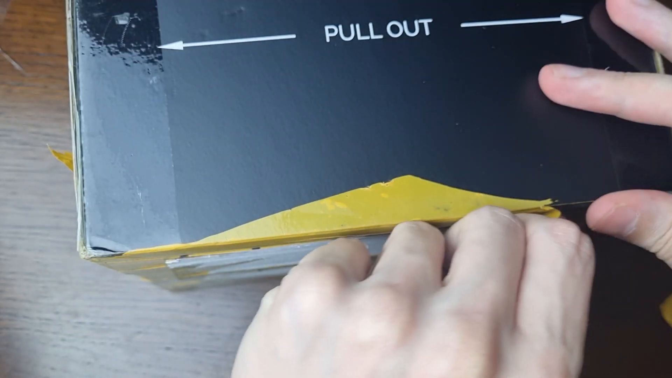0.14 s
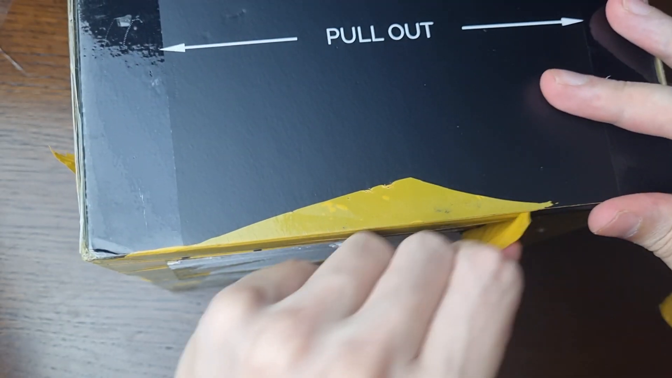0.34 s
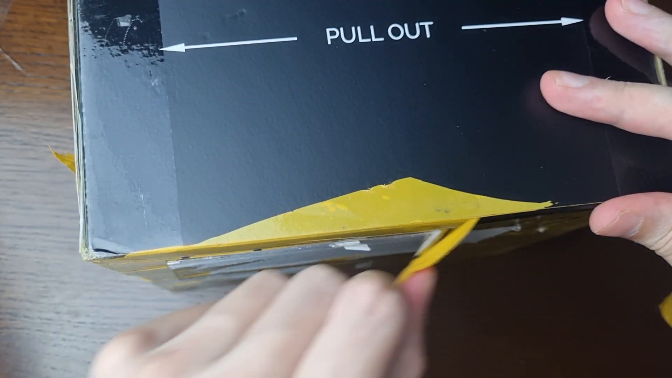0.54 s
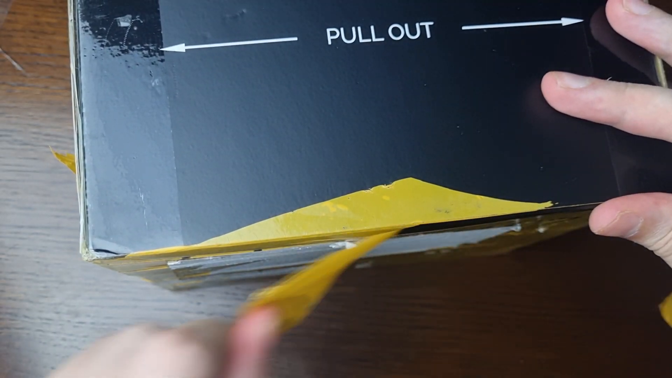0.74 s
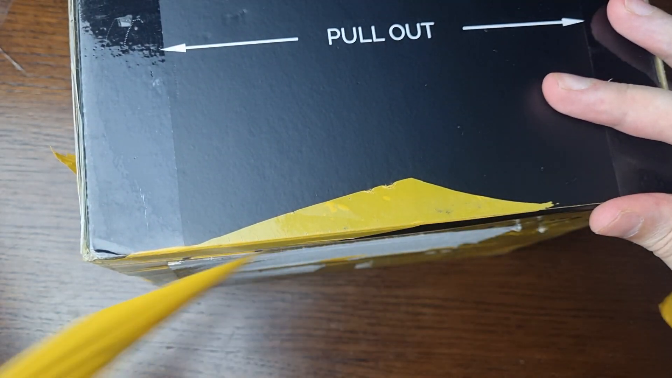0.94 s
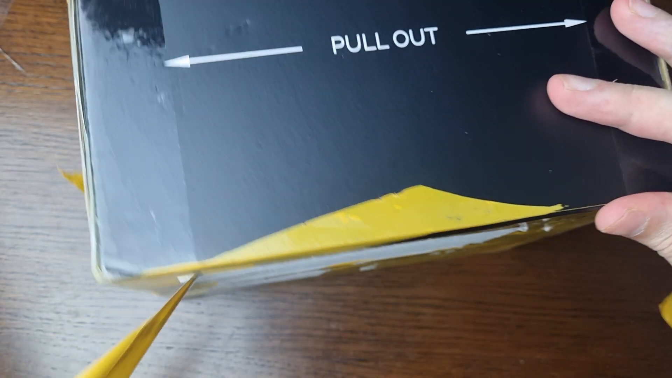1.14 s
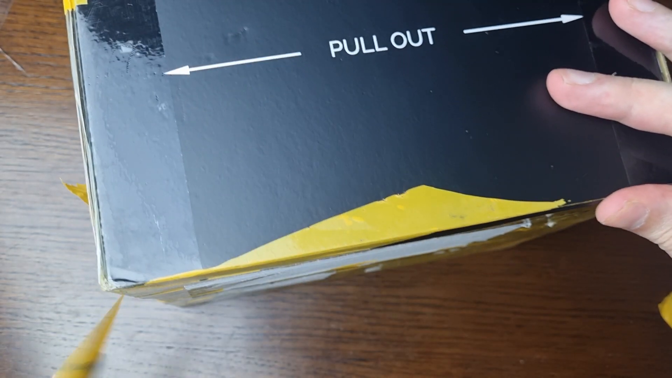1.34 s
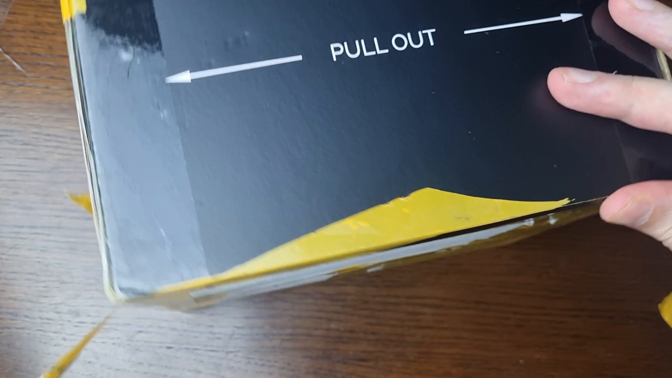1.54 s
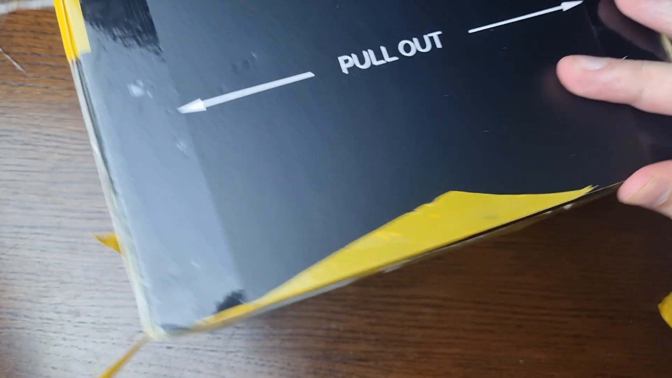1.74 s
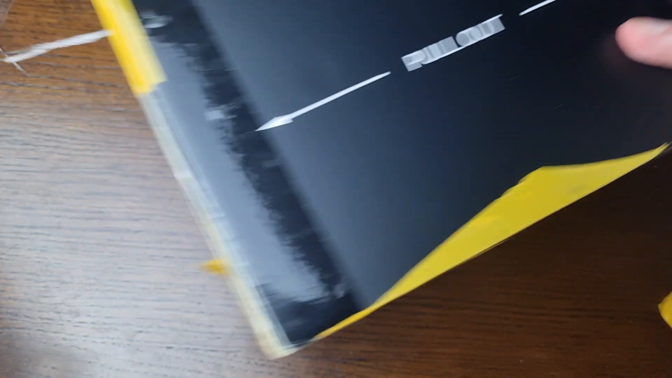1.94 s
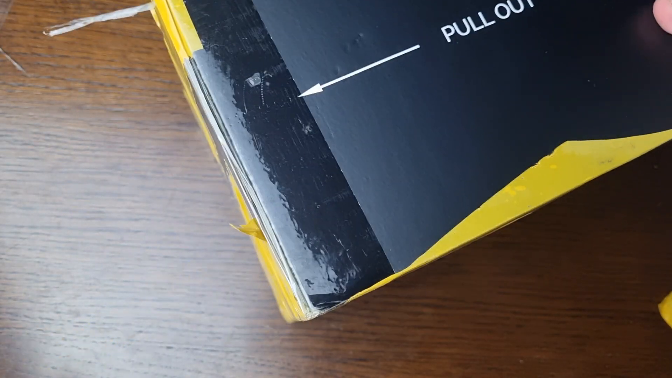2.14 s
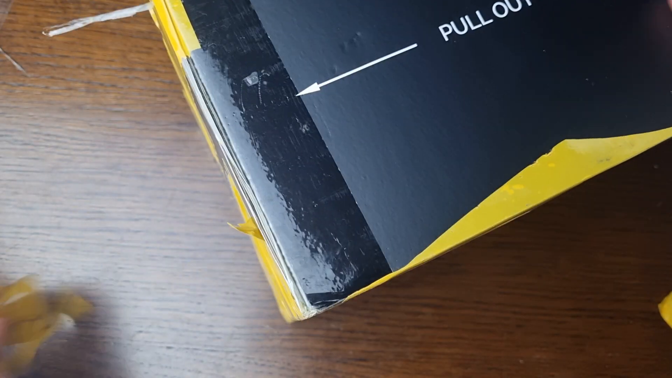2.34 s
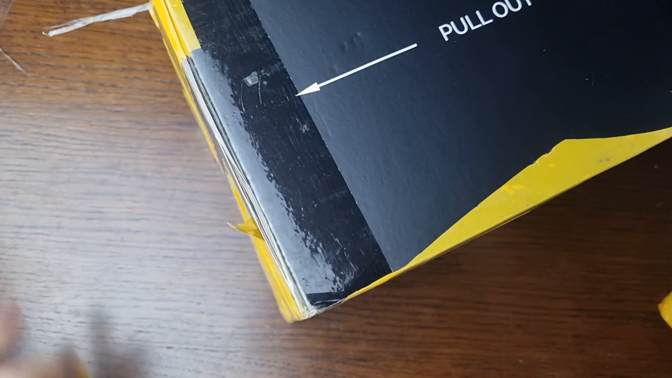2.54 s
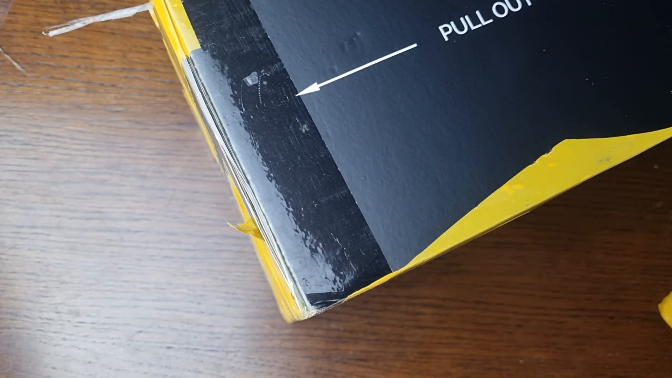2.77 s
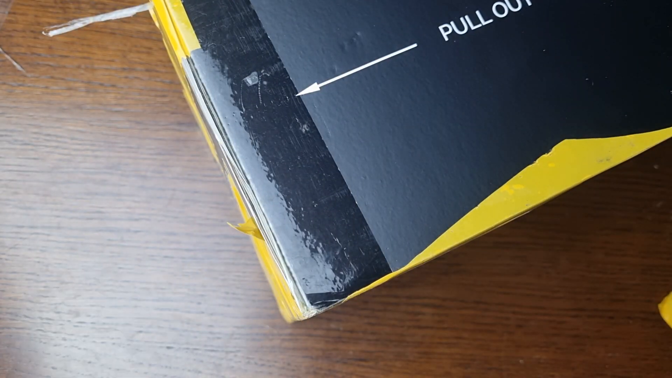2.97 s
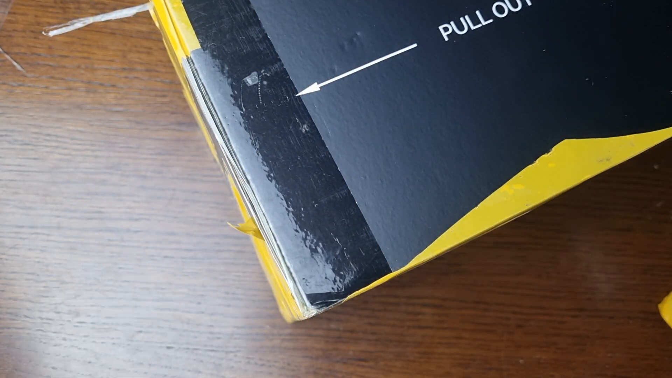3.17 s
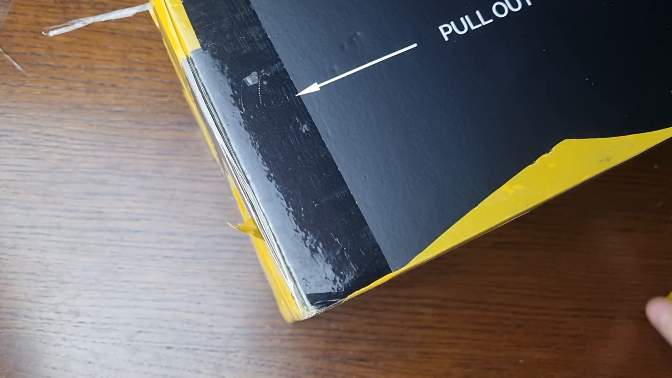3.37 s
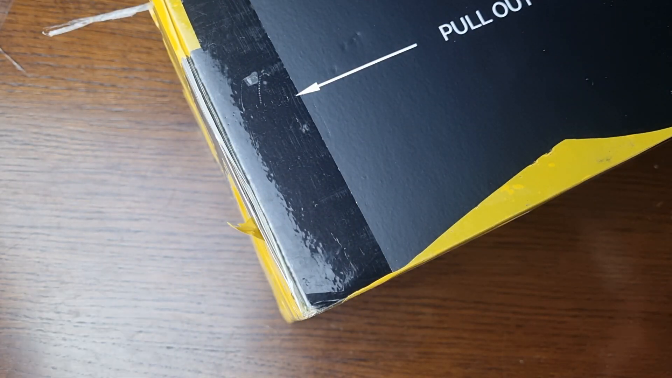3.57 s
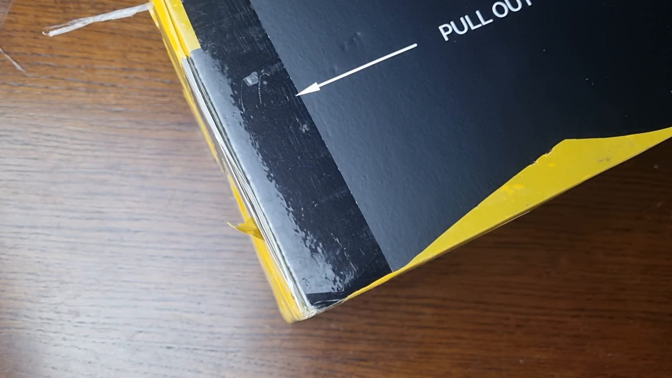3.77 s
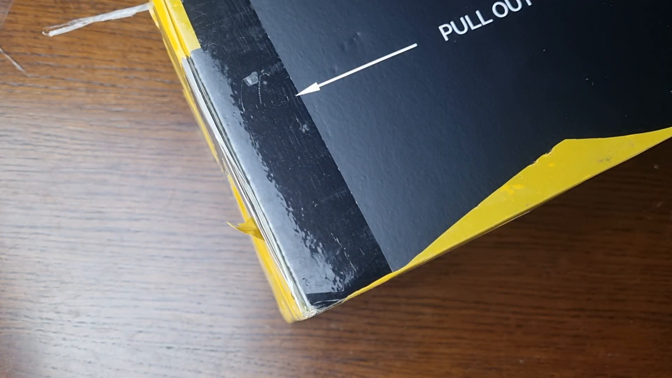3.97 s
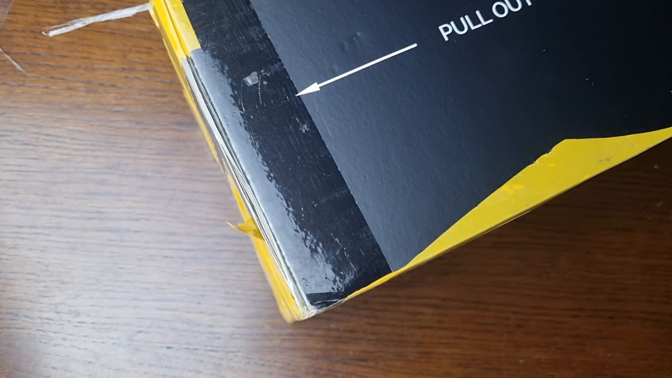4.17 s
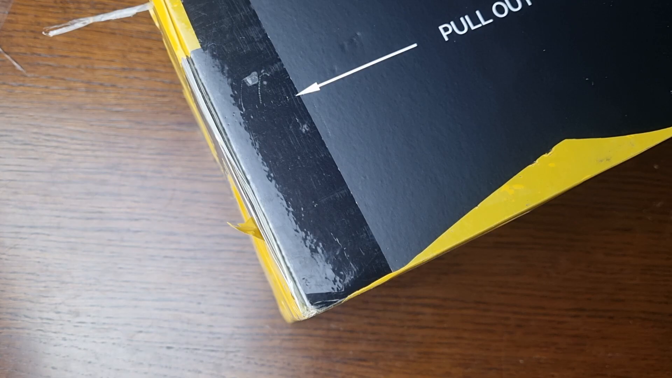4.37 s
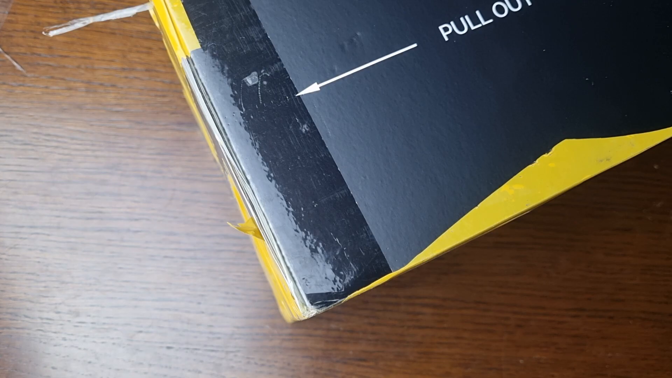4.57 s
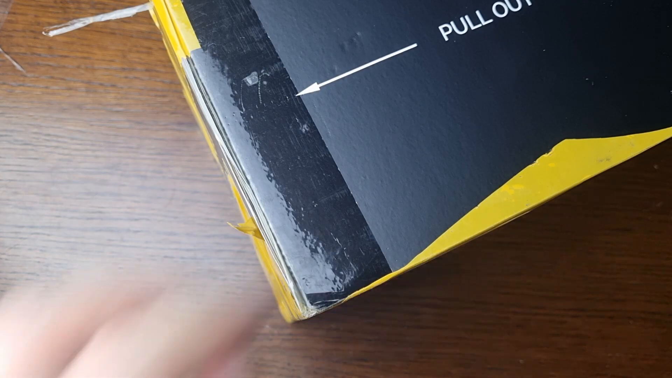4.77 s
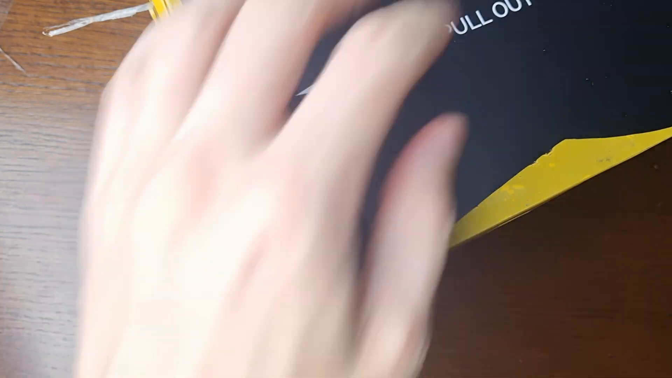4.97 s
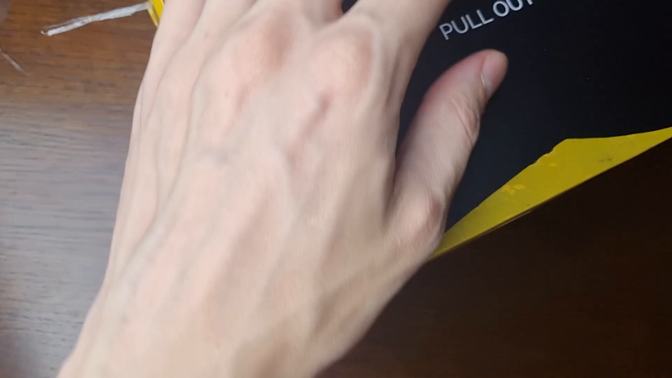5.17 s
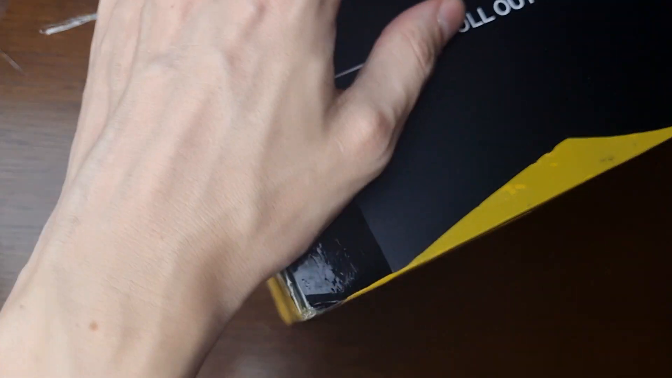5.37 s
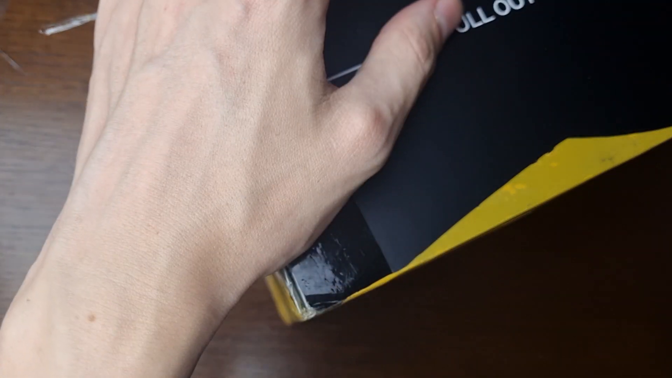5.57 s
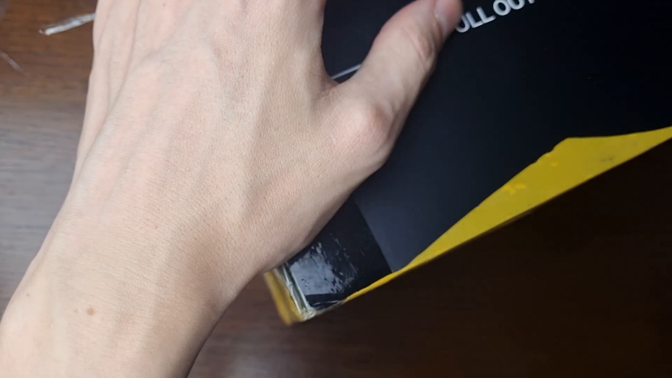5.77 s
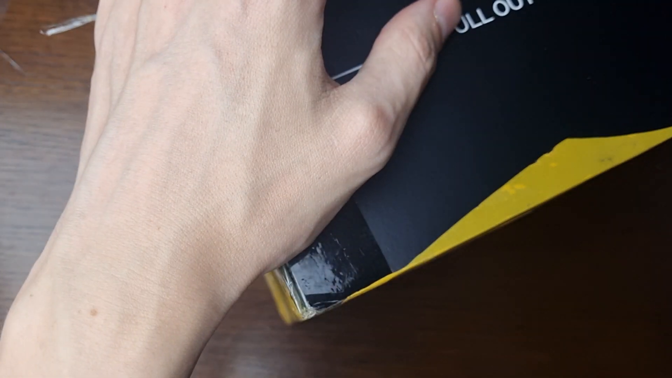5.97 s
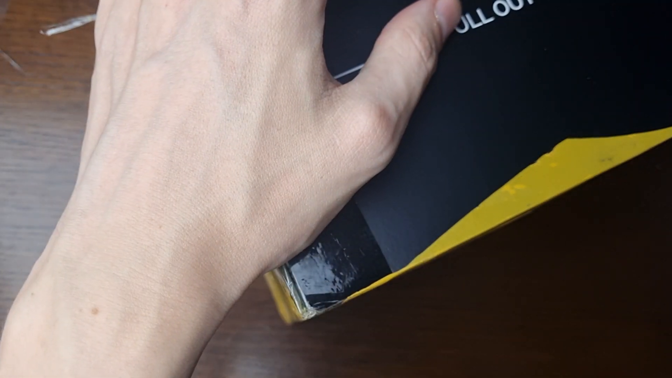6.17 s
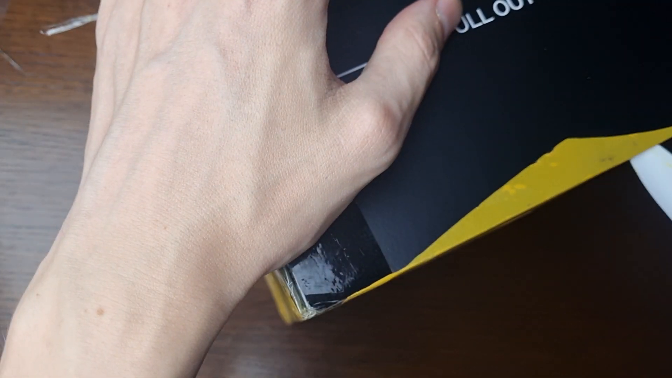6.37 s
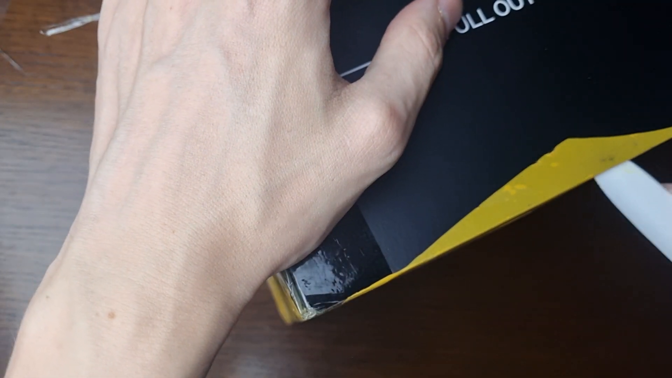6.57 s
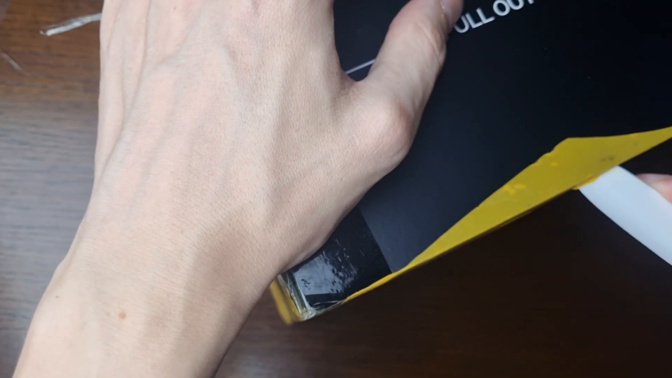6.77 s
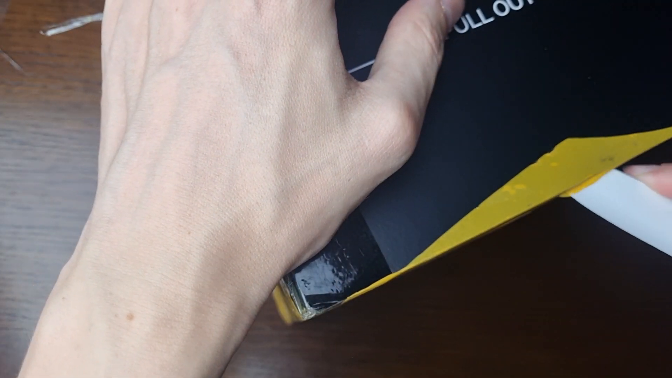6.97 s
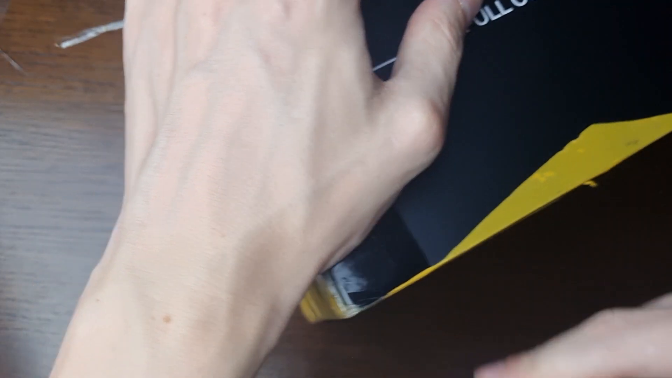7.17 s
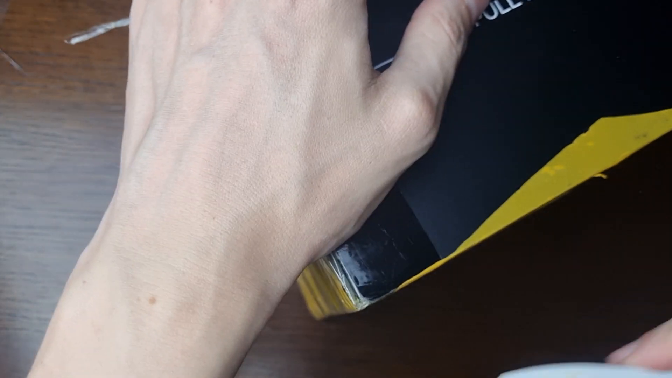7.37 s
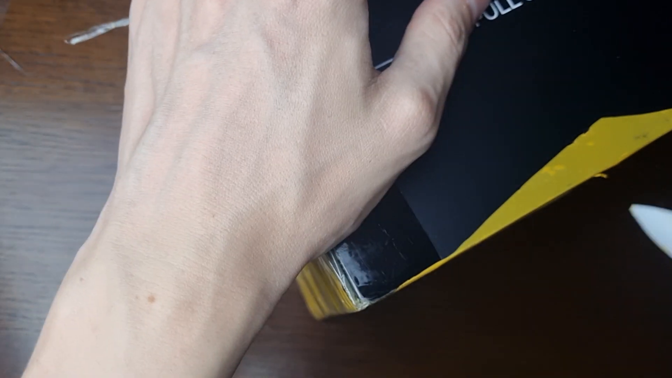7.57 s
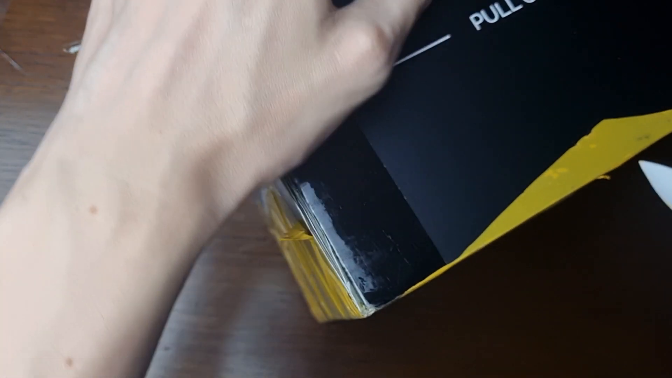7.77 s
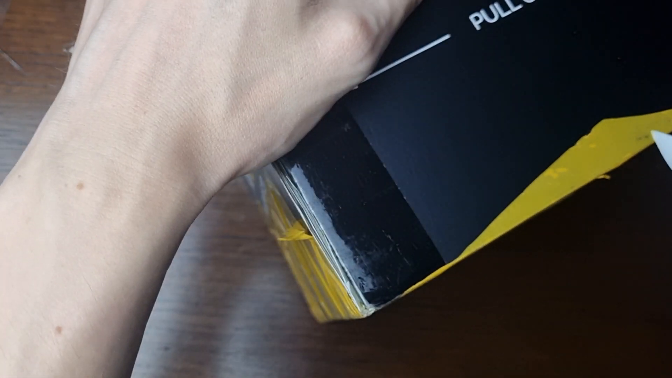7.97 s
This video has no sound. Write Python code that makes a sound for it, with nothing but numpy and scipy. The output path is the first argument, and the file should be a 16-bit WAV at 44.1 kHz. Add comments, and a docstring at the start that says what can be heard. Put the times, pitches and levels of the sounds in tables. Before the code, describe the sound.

Very close stereo in a small quiet room: tape is pulled off a hollow cardboard box with snaps, a quick stutter and a dense crackly rip, then a louder volley of pops. Small crinkles follow as the tape is crumpled, then near silence with a faint thin squeak. Finally a knife rubs and taps the box, and slits tape with one sharp crack.

```python
"""Packing tape is peeled off a cardboard box in a stereo close-up, then crumpled; a thin squeak follows, and at last
a knife slits more tape. The glue lets go in snaps and a dense crackle: noise bursts that also excite the decaying
modes of the hollow box. Hands, knife and table push on the box, brushes are swelling noise, the squeak is a sine.
A small room answers with scattered echoes, over a wavering low hum of narrow noise bands and a faint hiss."""
import sys
import numpy as np
from scipy import signal
from scipy.fft import rfft, irfft
from scipy.io import wavfile
from scipy.ndimage import uniform_filter1d

SR = 44100
rng = np.random.default_rng(int(sys.argv[2]) if len(sys.argv) > 2 else 0)


def gain_from_db(level_db):
    """Turn a decibel level (scalar or array-like) into a linear amplitude factor."""
    decades = np.asarray(level_db, float) / 20
    return 10 ** decades


def to_wav(s):
    """Save 16-bit WAV."""
    ch = np.atleast_2d(s).T  # columns
    pcm = np.round(np.clip(ch, -1, 1) * 32767)  # PCM
    wavfile.write(sys.argv[1], SR, pcm.astype(np.int16))


N = 353241  # samples

# spectrum radiated by tape: (frequency [Hz], relative density [dB per Hz])
TAPE_SPECTRUM = [(880, -17), (1500, -10), (3030, -6), (3280, -8), (4300, -6), (6690, -7.5), (7620, -8.5),
                 (11300, -11.5), (14500, -11), (16000, -16.5), (16500, -35)]
# modes of the hollow box: (frequency [Hz], width before the damping factor [Hz], envelope peak [dB])
BOX_MODES = [(97, 44, -14), (159.3, 42, -13.5), (200, 44, -17), (314.4, 110, 1), (400, 77, -11),
             (503.2, 67, -6.5), (579, 93, -5.5), (731, 77, -10.5), (905.5, 150, -2.5), (1060, 52, -14),
             (1188.6, 95, -13), (1340, 250, 2.5), (1750, 180, -4), (2100, 88, -15)]
# where the hands work: (time [s], delay of the left behind the right in the treble [samples],
# level difference left-right [dB])
HANDS = [(0, 7.5, -1), (.4, -9.5, 0), (1.3, -11, 4), (1.8, -13.5, 4.5), (2.9, -9, 3), (3.3, 7.5, 0),
         (4.2, 11, -17), (5.4, 11, -8.5), (5.8, 5.5, -9.5), (6.5, 6.5, -2.5), (7.1, -4.5, -3), (8, 7, -5.5)]


def evened(x):
    """Normalises mean power: scales to rms 1."""
    return x / np.sqrt(np.mean(x ** 2) + 1e-20)


def read(points, hz):
    """Interpolates a spectrum on a logarithmic frequency axis."""
    f, value = np.transpose(points)
    return np.interp(np.log(hz + 1), np.log(f + 1), value)


def add(mix, s, sound):
    """Superposition: adds a sound to the mix from time s."""
    part = mix[..., round(s * SR):][..., :sound.shape[-1]]
    part += sound[..., :part.shape[-1]]


def sides(db):
    """Interaural level difference: gains of left and right, split evenly."""
    return gain_from_db(np.array([db / 2, -db / 2]))


def hands_db(s):
    """Level difference left-right [dB] that follows the hands."""
    times, _, difference_db = np.transpose(HANDS)
    return np.interp(s, times, difference_db)


def colour(x, points):
    """Linear-phase filtering by a short impulse response with the given spectrum."""
    hz = np.linspace(0, SR / 2, 257)
    gain = gain_from_db(read(points, hz)) * (hz < SR / 2)
    return signal.oaconvolve(x, signal.firwin2(255, hz, gain, fs=SR)[None], "same", axes=1)


def resonate(x, hz, width):
    """A single-pole complex resonator, of gain 1 at its centre."""
    r = np.exp(-np.pi * width / SR)
    return 2 * signal.lfilter([1 - r], [1, -r * np.exp(2j * np.pi * hz / SR)], x).real


def background(apart=0.31, steady=0.14, waver_db=3):
    """Partial coherence: two narrow low bands nearly alike on both sides, and a hiss independent on each."""
    # swells of the hum: (middle [s], full width at 1/e [s], lower band level [dB], upper band level [dB])
    swells = [(0.078, .15, -59, -73.5), (.3, 0.23, -56, -71), (1.6, 0.19, -60, -81.5),
              (2.017, 0.35, -70, -73), (2.36, 0.17, -74, -66), (2.545, 0.18, -67, -82.5),
              (3.104, 0.3, -65.5, -81.5), (3.885, 0.26, -67, -85), (4.318, 0.13, -63.5, -76.5),
              (4.769, 0.28, -59.5, -75), (5.17, 0.26, -62, -73), (5.602, 0.13, -63.5, -73),
              (6.056, 0.22, -65, -67.5), (6.5, 0.33, -76, -69), (6.875, 0.37, -67.5, -75),
              (7.26, 0.12, -64.5, -70), (7.694, 0.11, -61, -66.5), (7.836, 0.12, -56.5, -70)]
    # hum bands: (frequency [Hz], width of each of three resonators in series [Hz])
    hum_bands = [(67, 36), (182, 66)]
    # hum between swells: (lower band level [dB], upper band level [dB])
    rest_levels = (-76.5, -79.5)
    # hiss, kept above 250 Hz only: (frequency [Hz], relative density [dB per Hz])
    hiss_spectrum = [(12, -41), (20, -11), (32, -11), (65, 3), (94, -17), (184, -17), (297, -37),
                     (939, -50), (1470, -46), (1650, -51), (10000, -60.5), (13000, -56.5), (16500, -59)]
    hiss_db = -83

    middle, length, *levels = np.transpose(swells)
    t = np.arange(0, N / SR + .02, .01)[:, None]
    swell = np.exp(-(2 * (t - middle) / length) ** 2)
    noise, hum = rng.standard_normal((5, N)), 0
    for db, rest_db, (hz, width) in zip(levels, rest_levels, hum_bands):
        band = noise[0] + apart * noise[1:3]
        for _ in range(3):
            band = resonate(band, hz, width)
        # partly flattens the fluctuation natural to narrow noise
        power = uniform_filter1d((band ** 2).mean(0), 3000)
        band = band / (power + 1e-12) ** (steady / 2)
        waver = gain_from_db(waver_db * evened(uniform_filter1d(rng.standard_normal(len(t)), size=8)))
        envelope = gain_from_db(rest_db) * waver + swell @ gain_from_db(db)
        hum = hum + np.interp(np.arange(N) / SR, t[:, 0], envelope) * evened(band)
    hz = np.fft.rfftfreq(N, 1 / SR)
    hiss = irfft(rfft(noise[3:]) * gain_from_db(read(hiss_spectrum, hz)) * (hz > 250), N)
    return hum + gain_from_db(hiss_db) * evened(hiss)


def room(x, early_db=-9, early_ms=6.3, late_db=-15, mono_hz=800):
    """Reverberation: sparse taps of random sign, as close echoes off table and hands, then as a decaying tail."""
    # (frequency [Hz], time to decay by 60 dB [s])
    decay_times = [(250, .45), (700, 0.55), (1800, 0.49), (4600, 0.53), (12000, .36)]
    taps = np.zeros((2, SR))
    at = np.arange(40, SR - 20, 20) + rng.integers(0, 20, (2, (SR - 41) // 20))
    np.put_along_axis(taps, at, rng.choice([-1., 1.], at.shape), 1)
    early = taps * np.exp(-np.arange(SR) * 1000 / SR / early_ms)
    hz, t, z = signal.stft(taps, SR, nperseg=256)
    # long waves reach both sides nearly alike
    z = np.where(hz[:, None] < mono_hz, (z + 0.7 * z[::-1]) / np.sqrt(2), z)
    z = z * gain_from_db(-60 * t / read(decay_times, hz)[:, None])
    late = signal.istft(z, SR, nperseg=256)[1][:, :SR]
    early = gain_from_db(early_db) * early / np.linalg.norm(early[0])
    late = gain_from_db(late_db) * late / np.linalg.norm(late[0])
    return signal.fftconvolve(x.mean(0)[None], early + late, axes=1)[:, :N]


def spaced(x, broad_hz=1400, narrow_hz=2400):
    """Time difference of arrival: treble from the hands reaches one side first, the wide box both nearly together."""
    times, samples, _ = np.transpose(HANDS)
    hz, t, z = signal.stft(x, SR, nperseg=512, noverlap=384)
    share = np.interp(hz, [0, broad_hz, narrow_hz], [.4, .3, 1])[:, None]
    lag = np.interp(t, times, samples) / SR * share
    half_turns = np.array([1, -1])[:, None, None] * hz[:, None] * lag  # half the lag on each side
    return signal.istft(z * np.exp(-1j * np.pi * half_turns), SR, nperseg=512, noverlap=384)[1][:, :N]


def modes(damping=0.71):
    """Modal decay: each box mode is a damped sine with a soft start."""
    hz, width, db = np.transpose(BOX_MODES)[:, :, None]
    t = np.arange(3000) / SR
    u = np.pi * width * damping * t
    return gain_from_db(db) * u * np.exp(1 - u) * np.sin(2 * np.pi * hz * t)


def struck(force, rings, near_hz, reach_octaves=0.74, favour_db=14):
    """Modal excitation: where the box is struck decides which modes answer most; peak 1."""
    away = np.log2(np.array(BOX_MODES)[:, 0] / near_hz) / reach_octaves
    ring = signal.fftconvolve(force, gain_from_db(favour_db * np.exp(-away ** 2)) @ rings)
    return ring / abs(ring).max()


def favour(x, centre_hz, db, octaves, fall_db):
    """Radiation spectrum of tape, with one band lifted and what lies below it thinned (fall_db per octave)."""
    hz = np.fft.rfftfreq(x.shape[1], 1 / SR)
    away = np.log2((hz + 1) / centre_hz)
    lift_db = db * np.exp(-(away / octaves) ** 2)
    gain_db = read(TAPE_SPECTRUM, hz) + lift_db + fall_db * np.minimum(away, 0)
    return irfft(rfft(x) * gain_from_db(gain_db), x.shape[1])


def whistle(wobble_hz=30):
    """Frequency modulation: a thin high squeak is a sine of gliding, slightly unsteady pitch."""
    # (time [s], frequency [Hz], rms level [dB])
    glide = [(4.95, 11300, -95), (5.0, 12700, -83.5), (5.06, 12950, -79.5), (5.17, 12720, -83.5),
             (5.233, 11940, -85.5), (5.27, 13000, -84.5), (5.31, 13600, -79), (5.35, 12600, -85.5),
             (5.39, 11300, -96.5)]
    s, hz, db = np.transpose(glide)
    t, out = np.arange(s[0], s[-1], 1 / SR), np.zeros(N)
    wobble = wobble_hz * evened(uniform_filter1d(rng.standard_normal(len(t)), 200))
    phase = 2 * np.pi * np.cumsum(np.interp(t, s, hz) + wobble) / SR
    add(out, s[0], np.sqrt(2) * gain_from_db(np.interp(t, s, db)) * np.sin(phase))
    return out


def knocks(grit=0.48, damping=1.1, reach_octaves=0.4, favour_db=18):
    """Contact time: soft blows are rounded, gritty pushes; the longer the contact, the fewer high modes ring."""
    # blows of hand, knife and table: (time [s], peak level [dB], contact time [ms], box mode nearest [Hz])
    blows = [(0.237, -32.5, 1.5, 900), (0.239, -44, 4, 160), (0.383, -41, 2.8, 133),
             (0.749, -38.5, 2.7, 183), (0.963, -38, 2.3, 176), (1.151, -41.5, 2.8, 183),
             (1.231, -36, 7.7, 97), (1.533, -44.5, 4.6, 97), (1.823, -36, 5.4, 150),
             (1.899, -30.5, 3.6, 252.1), (2.212, -51.5, 0.36, 400), (2.235, -45.5, 1.2, 558),
             (2.282, -48, 0.26, 400), (2.362, -49.5, 1.3, 400), (3.373, -47, 2.7, 191),
             (3.388, -46.5, 2.1, 194), (3.421, -50, 3.1, 193), (3.399, -42, 4.16, 121.7),
             (4.931, -58, 0.11, 1295), (6.615, -39, 1.1, 384), (6.74, -38, 0.37, 330),
             (6.843, -32, 0.64, 386), (7.112, -37.5, 3.9, 129), (7.142, -39, 5.2, 97),
             (7.16, -51.5, 3, 160), (7.1445, -32, 0.18, 1600), (7.261, -47, 1.24, 280),
             (7.646, -59.5, 1.43, 465), (7.789, -51, 0.21, 1300), (7.83, -45.5, 2.56, 108.5)]
    out, rings = np.zeros(N), modes(damping)
    for (s, db, ms, box_hz), noise in zip(blows, rng.standard_normal((len(blows), 3000))):
        u = np.arange(3000) * 1000 / SR / max(ms, .05)  # time in contacts
        push = np.sin(np.pi * np.minimum(u, 1)) ** 2 + grit * noise * np.exp(-u / 2)
        add(out, s, gain_from_db(db) * struck(push, rings, box_hz, reach_octaves, favour_db))
    return out


def brushes(unlike=0.72, lumpy_db=3):
    """Friction noise: tape, skin and blade brush past as lumpy noise under a smooth swell."""
    # (middle [s], length, held to at least 300 samples [ms], rms level before the swell [dB],
    # favoured band [Hz], lift of that band [dB])
    strokes = [(0.821, 65, -36, 4400, 6), (1.037, 56, -41.5, 7400, 7), (1.192, 86, -44, 3120, -5),
               (1.255, 25, -36.5, 5230, -11.5), (2.293, 37, -65.5, 3560, 25), (2.398, 23, -37.5, 2780, 4),
               (2.593, 94, -60, 5000, 3.5), (2.867, 50, -60.5, 4150, -0.5), (3.171, 50, -47, 5400, -20.5),
               (3.559, 42, -67, 5980, 17.5), (3.69, 64, -77, 4020, -1.5), (3.885, 7.7, -73.5, 12800, 14.5),
               (3.939, 30.5, -78.5, 10000, 9.5), (4.337, 7.6, -78.5, 12700, 13.5), (5.48, 29, -84, 8020, 6),
               (6.089, 6.2, -80, 6000, 1), (3.754, 45, -69, 7730, 29), (4.025, 22, -68.5, 7990, 10),
               (4.156, 43, -68, 8980, 6.5), (4.226, 12, -70.5, 13550, 21), (4.454, 7.9, -63.5, 5500, 36),
               (4.476, 67, -80, 5440, 23), (5.3, 130, -81, 2166, 23), (4.936, 10, -72, 2453, 14.5),
               (5.064, 30, -80.5, 10000, 9), (5.169, 37, -78, 8580, -2), (5.264, 70, -69.5, 7940, 13),
               (5.399, 41, -78, 9030, 6.5), (6.241, 48, -71, 8170, 12), (6.619, 59, -51, 3490, 4.5),
               (6.743, 24, -57, 2380, 5), (6.848, 37, -55.5, 2360, 12.5), (7.8, 28, -71, 7790, 5.5),
               (7.906, 36, -69.5, 5760, 13.5)]
    out = np.zeros((2, N))
    for (s, ms, db, hz, band_db), noise in zip(strokes, rng.standard_normal((len(strokes), 4, 6000))):
        size = int(np.clip(ms * SR / 1000, 300, 6000))
        noise = noise[:, :size]
        lumps = gain_from_db(lumpy_db * evened(uniform_filter1d(noise[3], 60)))
        rub = favour(lumps * (noise[0] + unlike * noise[1:3]), hz, band_db, 1.0, 1)
        sound = evened(rub) * np.hanning(size)
        add(out, s - size / SR / 2, gain_from_db(db) * sides(hands_db(s))[:, None] * sound)
    return out


def peel(per_s=3000, spread_db=-0.5, tail_ms=0.29, bump_db=4, bump_octaves=0.076, unlike=1.0,
         reach_octaves=0.5, favour_db=11, patchy_db=2.5):
    """Shot noise: tiny random releases radiate from the free tape, which favours one band, and drive the box."""
    # peeling, ripping and rubbing, one table a stretch:
    # (time [s], crackle level [dB], favoured band [Hz], box level [dB], box mode nearest [Hz])
    stretches = [
        [(.03, -73.5, 4770, -79, 860), (.31, -46.5, 5575, -51.5, 610), (.41, -48.5, 5826, -49, 486),
         (.47, -49, 7080, -45, 600), (.53, -47.5, 7430, -48, 780), (.58, -48, 7600, -51, 600),
         (.66, -41.5, 5384, -39, 345), (.72, -40.5, 4770, -42.5, 1260), (.78, -38.5, 4565, -35, 340),
         (.86, -40.5, 4700, -40, 715), (.94, -41.5, 5520, -34.5, 633), (1.09, -47.5, 6760, -44, 436),
         (1.2, -53, 5070, -40.5, 463), (1.34, -64, 3760, -59.5, 833), (1.5, -94.5, 5994, -97, 890)],
        [(1.51, -73.5, 5390, -71, 800), (1.7, -56, 4490, -67, 1220), (1.76, -66.5, 5500, -105, 1000),
         (1.82, -54, 5550, -57, 1200)],
        [(1.82, -31.5, 7277, -42, 590), (1.855, -27, 8104, -32.5, 870), (1.868, -34.5, 7100, -29.5, 516),
         (1.912, -24, 7876, -32.5, 340)],
        [(2.18, -67.5, 4320, -64.5, 500), (2.3, -76.5, 4500, -69, 700), (2.41, -53, 3333, -62, 565),
         (2.5, -74.5, 5900, -80.5, 710), (2.7, -78.5, 6260, -86.5, 400)],
        [(2.78, -88, 4000, -87.5, 400), (2.85, -69, 4460, -85.5, 600), (2.98, -75, 4640, -86.5, 1204),
         (3.11, -44.5, 5140, -77, 498), (3.24, -52.5, 5800, -69, 1300), (3.31, -78, 6015, -92, 500),
         (3.372, -46.5, 5490, -67, 600), (3.51, -77, 5570, -83, 497), (4.4, -93.5, 6550, -97, 597)],
        [(4.9, -90, 3003, -87, 400), (5.25, -84.5, 2592, -89.5, 804), (5.55, -91.5, 2970, -87, 350)],
        [(6.2, -93.5, 7770, -104.5, 700), (6.29, -70, 7945, -91.5, 695), (6.38, -59.5, 7037, -69, 1300),
         (6.54, -67, 5277, -72, 1290), (6.63, -61.5, 4300, -62.5, 2030), (6.74, -69, 3145, -68.5, 685),
         (6.87, -77, 2730, -70.5, 1980), (7.106, -68, 5088, -68, 1100)],
        [(7.106, -46, 3823, -54, 700), (7.125, -37, 2770, -47.5, 710), (7.138, -29, 5520, -47, 655),
         (7.147, -24, 7560, -56, 647), (7.157, -46.5, 5080, -64, 300)],
        [(7.6, -84, 4930, -96, 500), (7.69, -64.5, 5318, -86, 1194), (7.8, -78, 6160, -72, 450),
         (8.0, -101, 5387, -86, 300)],
    ]
    # bands that stand out while the knife rubs the tape: (frequency [Hz], half width at 1/e in dB [Hz], lift [dB])
    blade_bands = [(1360, 170, 3), (2390, 600, 6.3), (4940, 400, 3.7), (6040, 360, 5.5), (7990, 400, 2.7),
                   (9800, 1100, 7.4)]
    # when the knife rubs: (start [s], end [s])
    blade_span = (6.1, 7.1)

    size = gain_from_db(spread_db * np.minimum(rng.exponential(1, N), 4)) * (rng.random(N) < per_s / SR)
    noise, t = rng.standard_normal((4, N)), np.arange(N) / SR
    busy = signal.lfilter([1], [1, -np.exp(-1000 / SR / tail_ms)], size)

    releases = colour(busy * (noise[0] + unlike * noise[1:3]), TAPE_SPECTRUM)
    hz, frames, z = signal.stft(releases, SR, nperseg=256)
    favoured_hz = np.interp(frames, *np.vstack(sorted(stretches))[:, [0, 2]].T)
    away = np.log2((hz[:, None] + 1) / favoured_hz) / bump_octaves
    # random patches in time and frequency make the crackle uneven
    patches = uniform_filter1d(uniform_filter1d(rng.standard_normal(z.shape[1:]), 4, 0), 16, 1)
    z = z * gain_from_db(bump_db * np.exp(-away ** 2) + patchy_db * evened(patches))
    blade_db = sum(db * np.exp(-((hz - f) / width) ** 2) for f, width, db in blade_bands)
    z = z * gain_from_db(np.outer(blade_db, (frames > blade_span[0]) & (frames < blade_span[1])))
    crackle = evened(signal.istft(z, SR, nperseg=256)[1][:, :N]) * sides(hands_db(t))

    drive = busy * (noise[3] + unlike / 2 * noise[1:3])
    body = np.array([signal.oaconvolve(drive, ring[None])[:, :N] for ring in modes()])
    power = (body ** 2).mean((1, 2))
    out = np.zeros((2, N))
    for rows in stretches:
        s, crackle_db, _, box_db, near_hz = np.transpose(rows)
        at = np.arange(round(s[0] * SR), min(round(s[-1] * SR), N))
        edge = signal.windows.tukey(len(at), 200 / len(at))
        # the spot pulled picks the modes
        near = np.exp(-(np.log2(np.array(BOX_MODES)[:, :1] / near_hz) / reach_octaves) ** 2)
        share = gain_from_db(favour_db * np.array([np.interp(t[at], s, mode) for mode in near]))
        rung = (share[:, None] * body[:, :, at]).sum(0) / np.sqrt(power @ share ** 2)
        crackle_gain, box_gain = (gain_from_db(np.interp(t[at], s, db)) for db in (crackle_db, box_db))
        out[:, at] += edge * (crackle_gain * crackle[:, at] + box_gain * rung)
    return out


def stutter():
    """Stick-slip: a second tick that shakes the box more answers each first; the gap closes as the pull speeds up."""
    # first tick of each pair (start of the faint lead-in [s])
    firsts = [.4574, .4848, .5132, .5372, .5586, .5811, .606, .6285]
    # to the second tick: (first pair [ms], last pair [ms])
    gap_ms = (9.8, 6.3)
    # first and second tick: (peak level before panning [dB], favoured band [Hz], box ring re peak [dB],
    # box mode nearest [Hz])
    tick = (-20.5, 7596, -15, 586)
    tock = (-24.5, 9396.5, -10, 600.5)
    gaps = np.interp(firsts, [firsts[0], firsts[-1]], gap_ms) / 1000
    return [(s, *tick) for s in firsts] + [(s + gap, *tock) for s, gap in zip(firsts, gaps)]


def snaps(lead_ms=1.0, lead_db=-13, rise_ms=0.18, fast_ms=0.98, slow_ms=2.2, slow_db=-12, peak_db=7,
          shake_ms=0.98, unlike=0.76, damping=1.3, left_db=2, scatter_db=3, onset_s=.0008,
          fall_db=2.4, thin_db=6):
    """Impulsive excitation: the glue lets go in a burst that dies in two steps; the jolt rings the box."""
    # clear releases of glue and folds of tape: (start of the faint lead-in [s]; the burst follows onset_s later,
    # peak level before panning [dB], favoured band [Hz], box ring re peak [dB], box mode nearest [Hz])
    releases = [(0.1196, -23, 2520, -21, 1480), (0.1261, -23, 3330, -33, 608),
                (0.2059, -20, 5540, -32, 581), (0.2768, -30.5, 4830, -9.5, 525),
                (0.3007, -22, 5570, -35, 576), (0.3466, -23, 13300, -18, 546),
                (0.3594, -25, 3330, -14, 301), (0.3815, -8.5, 5280, -14.5, 525),
                (0.412, -23.5, 7990, -16, 573), (0.436, -24, 7520, -11.5, 586),
                (0.8205, -26, 4620, -4.5, 624), (0.9632, -10, 12500, -11, 614),
                (0.9724, -8, 12100, -10.5, 560), (1.0374, -29, 7270, -2.5, 1180),
                (1.2341, -17, 2930, -1.5, 1310), (1.4052, -25.5, 6800, -21, 700),
                (1.4456, -33.5, 7340, -31, 633), (1.5364, -20.5, 7160, -17, 390),
                (1.5609, -9.5, 7500, -18.5, 535), (1.6122, -9.5, 7870, -15.5, 304),
                (1.725, -43.5, 4500, -24, 1384), (1.8223, -11, 4040, -14.5, 445),
                (1.8264, -6, 14600, -22.5, 487), (1.8344, -12, 5240, -38, 950),
                (1.8384, -6.5, 4900, -27, 460), (1.8447, -2.5, 7820, -21, 369),
                (1.8504, -7.5, 5290, -18, 310), (1.8644, -9.5, 7500, -13, 331),
                (1.8736, -9.5, 7730, -14.5, 350), (1.8795, -8, 7730, -15, 320),
                (1.8834, -10, 7530, -18, 650), (1.8874, -3, 7460, -18, 1280),
                (1.8924, -8.5, 7500, -11, 1330), (1.8994, -4.5, 7610, -18, 304.2),
                (1.9044, -11, 4410, -7.5, 308), (2.2159, -44.5, 2520, 3, 550),
                (2.3356, -39.5, 4860, -20, 272), (2.372, -31.5, 4150, -13.5, 590),
                (2.4239, -37.5, 4940, -31, 1520), (2.5024, -38, 5100, -19.5, 1310),
                (2.5124, -32, 3420, -28, 1210), (2.5192, -26, 8730, -29, 1410),
                (2.6599, -48, 4980, -42.5, 360), (2.798, -49, 3730, -29.5, 549),
                (2.8165, -47, 3740, -34, 299), (2.8464, -57.5, 4480, -16.5, 543),
                (2.8868, -34.5, 3840, -17.5, 1420), (3.033, -36, 3930, -15.5, 1480),
                (3.0525, -30, 3780, -22.5, 1010), (3.0594, -32, 5290, -12, 493),
                (3.0684, -29.5, 4930, -22, 497), (3.0829, -23, 2850, -21.5, 1360),
                (3.1053, -25, 13200, -43, 1500), (3.1514, -24, 5750, -34, 1470),
                (3.1597, -18, 5330, -35, 1300), (3.264, -36.5, 5170, -41, 1510),
                (3.3618, -34.5, 12300, -32, 1350), (3.3777, -32.5, 5060, -23, 270),
                (3.4057, -16.5, 5030, -39, 550), (3.48, -38.5, 8470, -35, 1560),
                (3.5059, -34.5, 5560, -28, 288), (3.5379, -43, 5300, -41, 483),
                (3.7429, -57.5, 7680, -26.5, 453), (4.0267, -47.5, 12420, -35.5, 366),
                (4.0542, -42, 12580, -43, 307), (5.9294, -67.5, 4774, -8, 633),
                (6.4881, -52, 5710, -23, 1350), (6.6543, -35, 6210, -17.5, 296),
                (7.0045, -30, 2720, -22, 1570), (7.1084, -19, 14000, -23.5, 660),
                (7.1162, -10.5, 5560, -19, 840), (7.1437, -7.5, 5000, -22, 464),
                (7.3033, -51.5, 7250, -18, 466), (7.634, -50.5, 5220, -14, 484),
                (7.6465, -39, 4740, -17.5, 272), (7.6608, -47.5, 8130, -15.5, 320),
                (7.6954, -53, 2100, -13, 470), (7.9064, -50.5, 5680, -28.5, 326)]
    ms, out, rings = np.arange(-300, 1200) * 1000 / SR, np.zeros((2, N)), modes(damping)
    rows = [(*row, fall_db) for row in releases]
    rows += [(*row, thin_db) for row in stutter()]  # stutter ticks are thin
    after = np.maximum(ms, 0)
    fade = (1 - np.exp(-after / rise_ms)) * np.exp(-after / fast_ms)
    fade = fade + gain_from_db(slow_db) * np.exp(-after / slow_ms)
    fade = np.where(ms < 0, gain_from_db(lead_db) * np.exp(ms / lead_ms), fade)
    draws = rng.standard_normal((len(rows), 4, len(ms)))
    for (s, db, hz, kick_db, box_hz, below_db), noise in zip(rows, draws):
        # each burst differs partly between the sides; its place scatters at random around the hands
        burst = favour((noise[0] + unlike * noise[1:3]) * fade, hz, peak_db, 0.088, below_db)
        burst = gain_from_db(db) * burst / abs(burst).max()
        pan_db = hands_db(s) + left_db + scatter_db * noise[3, 0]
        add(out, s + onset_s + ms[0] / 1000, sides(pan_db)[:, None] * burst)
        jolt = noise[3, 300:] * np.exp(-ms[300:] / shake_ms)
        add(out, s + onset_s, gain_from_db(db + kick_db) * struck(jolt, rings, box_hz))
    return out


def scene():
    """Superposition of direct sound, room and background."""
    near = snaps() + knocks() + brushes() + peel() + whistle()
    return spaced(near) + room(near) + background()


def top_cut(x):
    """Nothing passes above the cut-off."""
    return signal.sosfilt(signal.butter(12, 16970, fs=SR, output="sos"), x)


def record(dry):
    """High-pass response: the microphones lose deep bass."""
    heard = signal.sosfilt(signal.butter(3, 52, "high", fs=SR, output="sos"), dry)
    return top_cut(heard)


dry = scene()
out = record(dry)
to_wav(out)
```